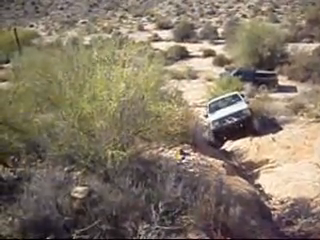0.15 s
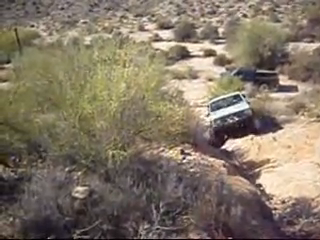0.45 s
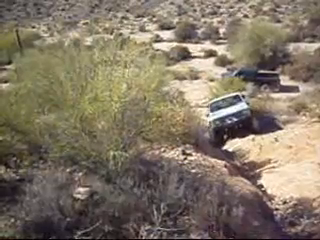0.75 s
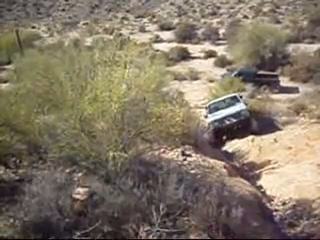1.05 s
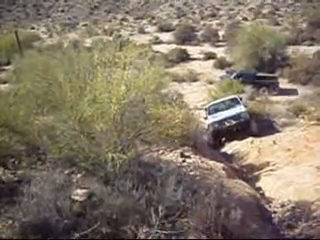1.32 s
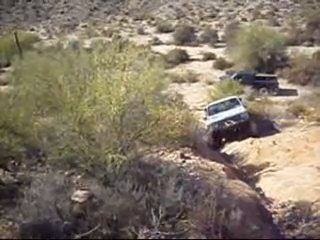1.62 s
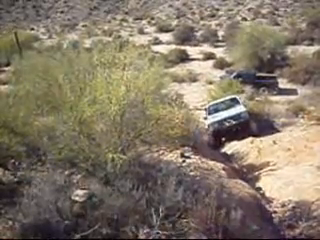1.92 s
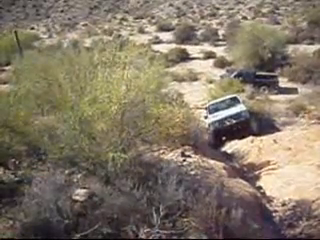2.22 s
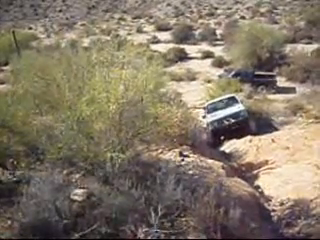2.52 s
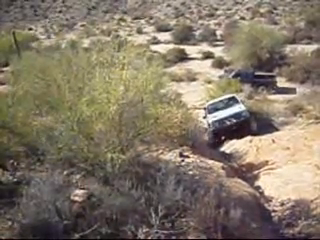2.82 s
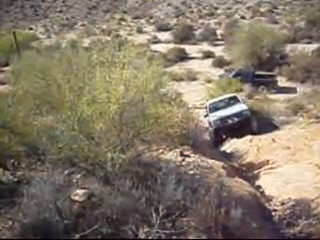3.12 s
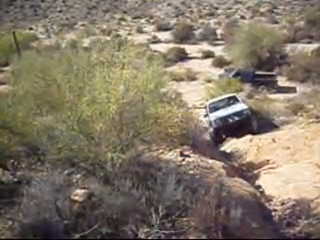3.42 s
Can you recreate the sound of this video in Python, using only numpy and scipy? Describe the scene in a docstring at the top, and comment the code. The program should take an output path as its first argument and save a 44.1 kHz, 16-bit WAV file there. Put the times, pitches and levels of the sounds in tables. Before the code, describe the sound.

A truck engine drones some way off, laboring over rocks as wind buffets the microphone.

```python
"""The low drone of a six-cylinder truck some way off, sagging and picking up twice on a rocky slope.
Its note is a series of crankshaft orders, roughened by a puff of exhaust at each firing.
Rocks knock, stones click, a wheel thumps down and gravel rustles, while gusts buffet the microphone.
A small camera adds motor whine and hiss, and its coarse sampling gives everything a metallic fizz."""
import sys
import numpy as np
from scipy import signal
from scipy.fft import rfft, irfft
from scipy.io import wavfile
from scipy.ndimage import map_coordinates

SR = 44100
rng = np.random.default_rng(int(sys.argv[2]) if len(sys.argv) > 2 else 0)


def master(y):
    """Save y as 16-bit WAV."""
    cut = np.clip(np.atleast_2d(y).T, -1, 1)
    pcm = np.round(cut * 32767)  # scale
    wavfile.write(sys.argv[1], SR, pcm.astype(np.int16))


N = 156555
TIME, FREQS = np.arange(N) / SR, np.fft.rfftfreq(N, 1 / SR)


def amp(db):
    """Amplitude ratio of a level in decibels."""
    return 10 ** (np.asarray(db) / 20)

def unit(x):
    """Normalisation to rms 1."""
    return x / np.sqrt(np.mean(x ** 2) + 1e-20)

def curve(points):
    """Linear interpolation of (t/s, value) points at every sample."""
    return np.interp(TIME, *np.transpose(points))

def colour(x, spectrum):
    """Spectral shaping by (f/Hz, level/dB) points, at rms 1."""
    hz, db = np.transpose(spectrum)
    gain = amp(np.interp(np.log(FREQS + .1), np.log(hz), db))
    return unit(irfft(rfft(x) * gain, N))

def drift(hz):
    """Slow random fluctuation: low-passed noise at rms 1."""
    return unit(irfft(rfft(rng.standard_normal(N)) * (FREQS > 0) / (1 + (FREQS / hz) ** 4), N))

def partial(order, turns):
    """A sinusoid of rms 1 and random phase at a multiple of a rotation rate."""
    return np.sqrt(2) * np.sin(2 * np.pi * (order * turns + rng.random()))


# crankshaft rotation rate: t/s, f/Hz
CRANK_SPEED = [(0,43.4),(.35,38.7),(.75,34.4),(1.3,30),(1.68,32.8),(1.86,37.5),(2.15,37),(2.45,36.5),(2.78,32.6),(3.0,34.3),(3.2,37.8),(3.55,38.3)]
# partials of the exhaust note: multiple of crank rate, relative level/dB
ENGINE_PARTIALS = [(1,3),(1.5,-9.5),(2,-8),(2.5,-11.5),(3,0.5),(3.5,-18.5),(4,-8.5),(4.5,-11),(5,-9),(6,-12.5),(7,-19),(8,-18.5),(12.5,-22)]
# envelope of the note: t/s, level/dB
NOTE_LEVEL = [(0,-35.5),(.25,-42),(.5,-40),(.9,-38),(1.3,-35.5),(1.65,-39.5),(1.9,-34.5),(2.2,-34),(2.5,-35.5),(2.85,-37),(3.15,-33.5),(3.55,-36.5)]
# envelope of the exhaust noise: t/s, level/dB
EXHAUST_LEVEL = [(0,-27.5),(.3,-30.5),(.6,-34),(.9,-31),(1.3,-35),(1.7,-34),(2.1,-40),(2.4,-31.5),(2.5,-36),(2.8,-30),(3.1,-31.5),(3.55,-33)]
# its spectrum: f/Hz, relative level/dB
EXHAUST_SPECTRUM = [(40,3),(70,-0.5),(120,1),(170,-2),(220,-5.5),(290,-4),(400,-12.5),(550,-25),(900,-43),(2000,-46)]

def engine(cylinders=6, puff_floor=.33, puff_decay_cycles=.44):
    """Four-stroke cycle: each cylinder fires once in two turns, giving half orders and pulsed noise."""
    turns = np.cumsum(curve(CRANK_SPEED) * (1 + .005 * drift(hz=12))) / SR
    note = sum(amp(db + 2 * drift(hz=8.2)) * partial(order, turns) for order, db in ENGINE_PARTIALS)
    firing_phase = (turns * cylinders / 2) % 1
    puffs = (puff_floor + np.exp(-firing_phase / puff_decay_cycles)) * rng.standard_normal(N)
    chug = colour(puffs, EXHAUST_SPECTRUM)
    return note * amp(curve(NOTE_LEVEL)) + chug * amp(curve(EXHAUST_LEVEL))


# rock impacts: t/s, greatest level/dB, centre f/Hz, width/octaves, decay time/s
ROCK_IMPACTS = [(0.456,-22,382,1,0.007),(0.877,-35,500,1,.005),(.897,-29,290,.6,0.0097),(0.923,-26,600,1,0.0051),(2.355,-30,277,0.3,0.013),(2.782,-32,376.4,0.76,.006),(3.072,-32.5,330,0.49,.010),(3.302,-29,619.5,.4,0.017)]

def rock_knocks(rise_s=.0036, cutoff_hz=1140):
    """Impact noise: rocks shift and strike, each giving a dull burst that decays exponentially."""
    out = np.zeros(N)
    for start, db, hz, octaves, decay in ROCK_IMPACTS:
        age = np.maximum(TIME - start, 0)
        band = np.exp(-.5 * (np.log2((FREQS + 1) / hz) / octaves) ** 2)
        band /= 1 + (FREQS / cutoff_hz) ** 10
        body = unit(irfft(rfft(rng.standard_normal(N)) * band, N))
        envelope = np.minimum(age / rise_s, 1) * np.exp(-np.maximum(age - rise_s, 0) / decay)
        out += amp(db) * body * envelope
    return out


def wheel_thump(start_s=3.2105, db=-14.5, hz=277, rise_s=.0017):
    """Damped oscillation: a wheel drops onto rock and the blow swings for about two cycles."""
    age = np.maximum(TIME - start_s, 0)
    envelope = age / rise_s * np.exp(1 - age / rise_s)
    return amp(db) * envelope * np.sin(2 * np.pi * hz * age)


# collisions of loose stones: t/s, level/dB
STONE_HITS = [(.374,-17),(.878,-16.5),(.999,-22),(2.398,-17),(2.578,-22),(3.211,-25)]
# modes of a stone: f/Hz, relative level/dB, decay time/s
STONE_MODES = [(890,-0.5,0.0022),(2700,-11,0.00051)]

def stone_clicks():
    """Free vibration: a struck stone rings in modes so strongly damped that one hears a click."""
    out = np.zeros(N)
    for start, db in STONE_HITS:
        age = np.maximum(TIME - start, 0)
        for hz, mode_db, decay in STONE_MODES:
            out += amp(db + mode_db) * np.sin(2 * np.pi * hz * age) * np.exp(-age / decay)
    return out


# envelope of the gravel's rustle: t/s, level/dB
RUSTLE_LEVEL = [(0,-41),(.25,-43),(.35,-51),(.7,-54),(1,-46),(1.8,-57),(2.6,-69),(3.55,-64)]
# its spectrum: f/Hz, relative level/dB
RUSTLE_SPECTRUM = [(500,-40),(1200,-2.5),(2200,1),(3100,3.5),(4000,-6.5)]
# tyre scrapes: centre t/s, level/dB
TYRE_SCRAPES = [(.18,-38.5),(.28,-39),(2.765,-40),(2.98,-44)]

def gravel(grains_per_s=2500, spread_db=1, scrape_s=.014):
    """Shot noise: random clicks under the tyres merge into a rustle that swells in short scrapes."""
    clicks = (rng.random(N) < grains_per_s / SR) * rng.choice([-1, 1], N)
    sizes = amp(spread_db * np.minimum(rng.exponential(1, N), 4))
    scrapes = sum(amp(db) * np.exp(-((TIME - at) / scrape_s) ** 2) for at, db in TYRE_SCRAPES)
    envelope = np.hypot(amp(curve(RUSTLE_LEVEL)), scrapes)  # powers add
    return colour(clicks * sizes, RUSTLE_SPECTRUM) * envelope


# envelope of the gusts: t/s, level/dB
GUST_LEVEL = [(0,-33),(.6,-23.5),(.85,-38),(1.25,-33.5),(1.42,-21),(1.52,-27),(1.64,-17.5),(1.78,-23),(1.9,-17.5),(2.04,-21.5),(2.12,-13.5),(2.22,-12),(2.33,-26),(2.65,-21),(2.9,-26.5),(3.2,-19.5),(3.55,-29)]
# spectrum of the buffeting: f/Hz, relative level/dB
WIND_SPECTRUM = [(2,1.5),(7,3.5),(14,0.5),(35,-2),(60,-11.5),(100,-29.5),(200,-23.5),(500,-64.5)]

def wind():
    """Turbulence: pressure fluctuations on the microphone make a low rumble that follows the gusts."""
    return colour(rng.standard_normal(N), WIND_SPECTRUM) * amp(curve(GUST_LEVEL))


# motor whine: harmonic number, level/dB
MOTOR_HARMONICS = [(1,-40.5),(3,-34.5),(4,-43.5),(5,-62),(6,-62.5),(9,-63.5)]
# whirr of the casing: f/Hz, relative level/dB
CASING_SPECTRUM = [(300,-31),(520,-17),(620,-11.5),(690,-2.5),(780,-3),(840,0.5),(910,-3.5),(1000,-5.5),(1080,-11),(1160,-18.5),(1280,-29),(1800,-32.5)]

def camera_motor(hz=245.85, waver=.0013, whirr_db=-31):
    """Forced vibration: a nearly steady motor whines in harmonics while its casing whirrs."""
    turns = hz * np.cumsum(1 + waver * drift(hz=9.4)) / SR
    whine = sum(amp(db) * partial(order, turns) for order, db in MOTOR_HARMONICS)
    whirr = amp(whirr_db) * colour(rng.standard_normal(N), CASING_SPECTRUM)
    return whine + whirr


# microphone hiss: f/Hz, relative level/dB
HISS_SPECTRUM = [(200,-6.5),(1300,-1),(1500,1),(1780,-8.5),(2150,4.5),(2500,-1),(2900,0.5),(3400,-4),(4000,-3)]

def microphone_hiss(db=-39.5):
    """Self-noise: the microphone adds a steady broadband floor."""
    return amp(db) * colour(rng.standard_normal(N), HISS_SPECTRUM)


def scene():
    """Superposition: truck, ground, wind and camera add in one channel."""
    truck = engine() + rock_knocks() + wheel_thump() + stone_clicks() + gravel()
    return (truck + wind() + camera_motor() + microphone_hiss())[None]

def low_pass(x, hz):
    """Steep band limiting by a windowed sinc filter."""
    return signal.oaconvolve(x, signal.firwin(801, hz, window=("kaiser", 9), fs=SR), "same")

def record(dry, hold_hz=8000, block_s=.063946, wobble_hz=3900, wobble_s=1e-5, cutoff_hz=12720):
    """Spectral imaging: a coarse sample-and-hold mirrors the sound into the treble as a fizz."""
    hold_times = TIME - ((TIME % block_s) * hold_hz % 1) / hold_hz  # the clock restarts each block
    hold_times += wobble_s * np.sin(2 * np.pi * wobble_hz * hold_times)
    baseband = low_pass(dry[0], hold_hz / 2)
    steps = map_coordinates(baseband, [hold_times * SR], order=3, mode="nearest")
    return low_pass(steps * signal.windows.tukey(N, .001), cutoff_hz)[None]


dry = scene()
out = record(dry)
master(out)
```